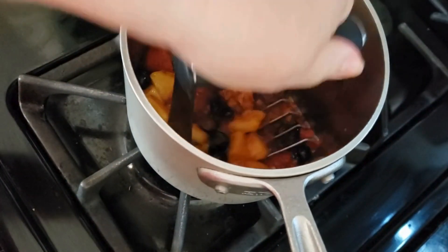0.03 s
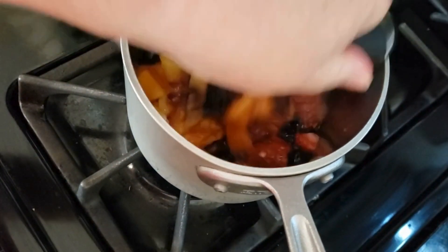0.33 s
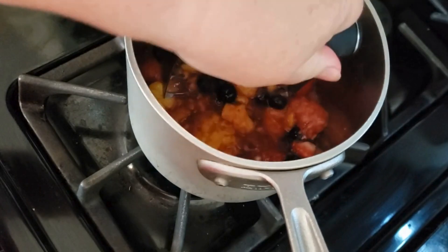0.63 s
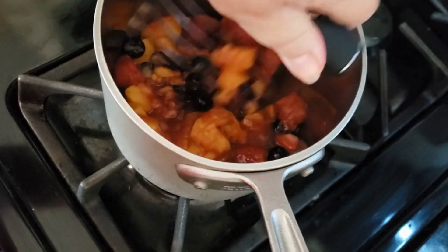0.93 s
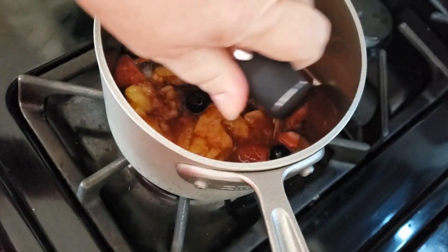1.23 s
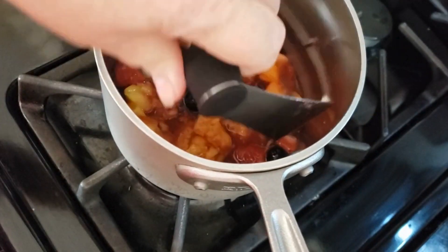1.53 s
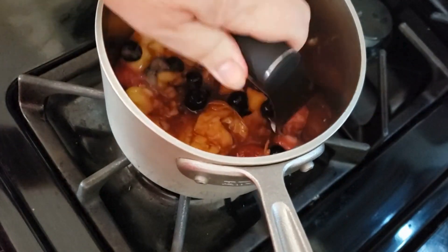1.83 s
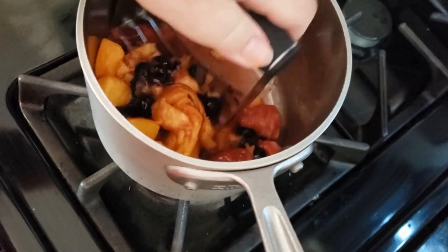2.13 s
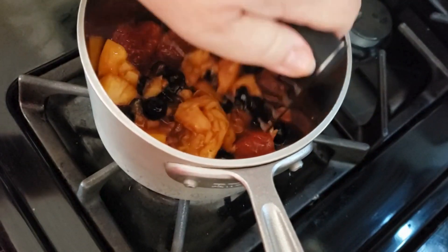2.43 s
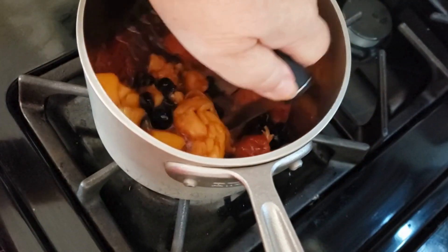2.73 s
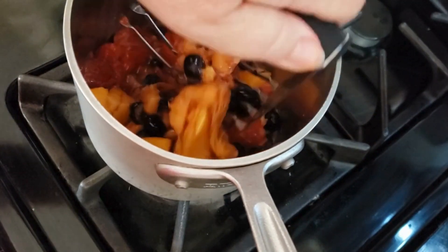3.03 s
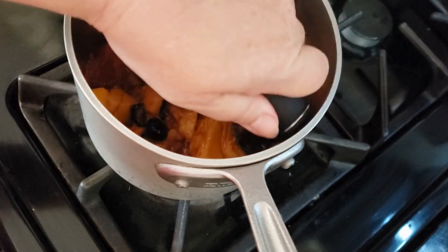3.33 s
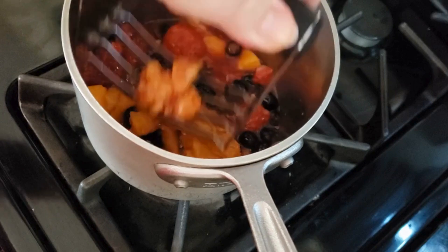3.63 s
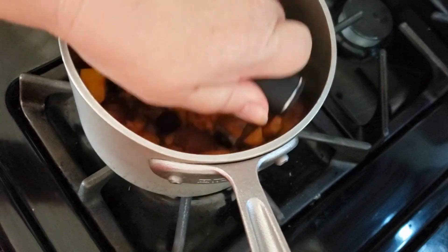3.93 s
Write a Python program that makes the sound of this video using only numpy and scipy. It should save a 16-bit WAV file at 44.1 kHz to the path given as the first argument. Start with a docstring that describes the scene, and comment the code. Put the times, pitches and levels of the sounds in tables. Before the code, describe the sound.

Wire masher knocking irregularly on a steel pan, with wet squelches of crushed fruit.

```python
"""Mashing fruit in a saucepan

A wire masher crushes soft fruit in a steel pan on a gas stove, close to a phone in a kitchen.
The wire clanks, taps and scrapes on the pan wall, and squeaks once. Each push thumps the pan
on its grate and squeezes the wet pulp: bubbles pop, juice spits and one air pocket plops."""
import sys
import numpy as np
from scipy import signal
from scipy.fft import rfft, irfft, next_fast_len
from scipy.io import wavfile
from scipy.ndimage import uniform_filter1d

SR = 44100
rng = np.random.default_rng(int(sys.argv[2]) if len(sys.argv) > 2 else 0)


def file_out(sig):
    """Save sig as 16-bit WAV at sys.argv[1]."""
    # one column per channel
    cols = np.atleast_2d(sig).T
    # limit, then scale
    lim = np.clip(cols, -1, 1)
    pcm = np.round(lim * 32767).astype(np.int16)
    wavfile.write(sys.argv[1], SR, pcm)


N = 176400  # 4 seconds
TIME = np.arange(N) / SR
ONE_SECOND = TIME[:SR]
HIT_DB, RING_DB = 27, -14.5  # boost for wire hits; level of the ringing they cause
PAN_LIKENESS = 0.52  # how alike the pan's noise is on the left and right

def gain(db):
    """Turn decibels into a number to multiply by."""
    return 10 ** (np.asarray(db) / 20)

def unit(x):
    """Scale each channel to an energy of 1."""
    return x / np.sqrt(np.sum(x ** 2, axis=-1, keepdims=True) + 1e-18)

def fade(fade_s, t=ONE_SECOND):
    """A curve that drops by 60 dB every fade_s seconds."""
    return np.exp(-np.log(1000) * t / fade_s)

def colour(x, points):
    """Shape the tone along (pitch_hz, level_db) points; white noise keeps its power."""
    size = next_fast_len(x.shape[-1] + 4096)
    size += size % 2
    hz, db = np.array(points, float).T
    curve_db = np.interp(np.log(np.fft.rfftfreq(size, 1 / SR) + 1), np.log(hz), db)
    # fold the filter in time so that it never sounds before a hit
    cepstrum = irfft(np.log(gain(curve_db)))
    cepstrum[1:size // 2] *= 2
    cepstrum[size // 2 + 1:] = 0
    response = np.exp(rfft(cepstrum))
    response /= np.sqrt(np.mean(abs(response) ** 2))
    return irfft(rfft(x, size) * response)[..., :x.shape[-1]]

def only(x, kind, hz):
    """Let only the "low" part, the "high" part or a "band" through."""
    return signal.sosfilt(signal.butter(2, hz, kind, fs=SR, output="sos"), x)

def noise(count, likeness):
    """Stereo hiss: likeness 0 makes the two sides unrelated, 1 makes them the same."""
    mid, side = rng.standard_normal((2, count))
    return (np.sqrt(1 + likeness) * mid + np.sqrt(1 - likeness) * np.array([side, -side])) / np.sqrt(2)

def add(out, start_s, x):
    """Mix a sound in at its start time."""
    i = int(start_s * SR)
    out[..., i:i + x.shape[-1]] += x[..., :max(N - i, 0)]

def through(x, response):
    """Make every sample of x set off a stereo ring or echo."""
    return signal.fftconvolve(np.atleast_2d(x), response, axes=-1)[:, :N]

def swell(start_s, length_s):
    """A rounded rise and fall."""
    return np.sin(np.pi * np.clip((TIME - start_s) / length_s, 0, 1)).clip(0) ** .5

def crackle(per_s, spread_db=8.5):
    """Random clicks of uneven size."""
    clicks = (rng.random(N) < per_s / SR) * rng.choice([-1, 1], N)
    clicks = clicks * gain(spread_db * rng.standard_normal(N).clip(-2, 2))
    return clicks / (clicks.std() + 1e-12)

# tone of the room's background: pitch_hz, level_db
AIR_TONE = [(20,-40),(58,7.5),(100,-3),(250,-9),(600,-21.5),(2000,-31.5),(16000,-35)]
def room_air():
    """The air of the room makes a faint, steady, low rush."""
    return gain(-59) * colour(noise(N, 0.66), AIR_TONE)

def ring(notes):
    """Steel rings in close pairs of notes; the spot hit sets their strength, the fruit their tuning."""
    t = ONE_SECOND[:SR // 3]
    out = np.zeros((2, len(t)))
    for hz, db in notes:
        strength, detune, apart, phase = rng.standard_normal(4)
        pair_hz = hz * (1 + 0.0036 * detune + 0.007 * apart * np.array([-.5, .5]))
        first = np.sin(2 * np.pi * pair_hz[0] * t)
        second = np.sin(2 * np.pi * pair_hz[1] * t + np.pi * phase) / 2
        out += gain(db + 7 * strength) * np.array([first + second, first - second])
    return unit(out * fade(0.16, t))

def wire_buzz(hz):
    """The struck wire buzzes around its own note until the fruit damps it."""
    buzz = only(noise(SR, PAN_LIKENESS), "band", hz * 2 ** (np.array([-1, 1]) / 20))
    return unit(buzz * fade(0.047))[:, :SR // 3]

# high notes of the pan's wall and low notes of its body: pitch_hz, level_db
WALL_NOTES = [(3257,-12),(3700,-2),(5617,-8),(7280,-7),(9900,-2)]
BODY_NOTES = [(452,2),(1530,-8.5),(2330,4)]
# wire hitting the wall: start_s, level_db, chatter_s, bass_db, treble_db, body_ring_db, wire_pitch_hz
WIRE_HITS = [(0.0759,-19.5,0.0033,-11.5,2.5,-11,7070),(0.1376,-30,0.00058,8.5,4.5,-1,5440),(0.415,-25.5,0.008,-6.5,-3.5,-12,4140),
             (0.7555,-21.5,0.00022,1,4.5,-6.5,5390),(0.827,-31.5,0.0068,0,2,9.5,5000),(1.142,-26,0.0028,2.5,1,-1,3560),
             (1.6084,-22,0.0053,-5,0,5.5,5840),(1.7685,-32,0.0025,3.5,-10.5,-10,3210),(1.871,-37.5,0.0023,2,-2,10,7450),
             (2.166,-40,0.0026,6.5,-3.5,-11,3530),(2.3192,-22.5,0.0061,-7,3,-1.5,3760),(2.3745,-22.5,0.0023,5.5,2,-2,3800),(2.6736,-24.5,0.0012,-4,-0.5,-9,4410),(2.719,-27.5,0.0032,5.5,16,-1.5,1500),
             (2.8262,-31,0.00081,-3.5,4.5,3.5,3900),(3.1516,-12.5,0.0095,-6,9,-0.5,7150),(3.161,-17,0.0056,-16,-1.5,2.5,3780),(3.2563,-27,0.0013,11.5,9.5,-3.5,1540),(3.5449,-26.5,0.0091,0.5,0.5,-6,4260)]
def clanks():
    """Each hit chatters and sets pan and wire ringing. Gives the push on the wall and the ringing."""
    force, rings, t = np.zeros(N), np.zeros((2, N)), ONE_SECOND[:SR // 20]
    for start_s, db, chatter_s, bass_db, treble_db, body_db, wire_hz in WIRE_HITS:
        contact = rng.standard_normal(len(t)) * np.exp(-t / chatter_s)
        contact[0] += 1.36  # the first impact, ahead of the chatter
        tone = [(900, bass_db), (3000, 0), (5500, 0), (11000, treble_db)]
        add(force, start_s, gain(db + HIT_DB) * unit(colour(contact, tone)))
        wall = gain(RING_DB) * ring(WALL_NOTES)
        body = gain(body_db - 15.5) * ring(BODY_NOTES)
        wire = gain(-10) * wire_buzz(wire_hz)
        add(rings, start_s, gain(db + HIT_DB) * (wall + body + wire))
    return force, rings

# tone of the struck wall: pitch_hz, level_db
CLASH_TONE = [(100,-18.5),(400,0.5),(1400,-6.5),(1900,-16),(2800,-5),(3700,6),(4800,-3.5),(5600,5),(6400,-4.5),(7300,1),(10000,-5),(12500,-5.5),(15500,-16)]
def wall_clash(force):
    """The wall answers each push with a sharp tick and a clash of many short notes."""
    clash = unit(noise(SR, PAN_LIKENESS) * fade(0.061))
    tick = gain(-6) * unit(noise(SR, PAN_LIKENESS) * fade(0.012))
    return through(force, unit(colour(clash + tick, CLASH_TONE)))

# notes of the full pan on its grate: pitch_hz, level_db, fade_s
GRATE_NOTES = [(62.8,-19.5,0.99),(127.6,-12,0.28),(150.8,1,0.21),(209.6,-22,0.41),(292.4,-11.5,0.22),(363.3,-17.5,0.33),(690.7,-9,0.063)]
# tones of the dull knock and of the stove top's rumble: pitch_hz, level_db
KNOCK_TONE = [(60,-4),(300,-5.5),(1250,0),(1700,-6.5),(2100,-7.5),(4000,-17),(16000,-33.5)]
RUMBLE_TONE = [(20,-63),(38,-29.5),(55,2.5),(80,-8),(125,1),(170,-5),(230,-13.5),(2000,-84)]
# pan bumping the grate: start_s, level_db, extra_knock_db, extra_rumble_db
PAN_THUMPS = [(0.082,-39.5,13,13),(0.139,-36.5,-6,-10),(0.2447,-29,1,0.5),(0.424,-36.5,10,-0.5),(0.669,-24,11.5,-4.5),(0.845,-38.5,11,10),(.955,-29,12,-30),
              (1.415,-49.5,-52,13.5),(1.612,-42.5,18,7.5),(1.771,-35.5,-16,0.5),(1.886,-23.5,5,-7),(2.088,-34.5,-10,5),(2.191,-32.5,-1,0),(2.327,-36.5,11.5,10),
              (2.68,-34.5,-4,-16),(2.721,-34.5,7.5,8),(2.829,-38.5,12,10.5),(3.167,-32.5,15,5),(3.260,-31.5,-0.5,9.5),(3.55,-44,14,4.5)]
def thumps():
    """Pushes cushioned by fruit: the pan knocks and bounces on its grate, and the stove top rumbles."""
    bounces, knock_power, rumble_power = np.zeros((3, N))
    t = ONE_SECOND[:SR * 3 // 4]
    for start_s, db, knock_db, rumble_db in PAN_THUMPS:
        tunings = 1 + 0.021 * rng.standard_normal(len(GRATE_NOTES))
        bounce = np.zeros(len(t))
        for (hz, note_db, fade_s), tuning in zip(GRATE_NOTES, tunings):
            strength = gain(note_db + rng.uniform(-3, 3))
            bounce += strength * np.sin(2 * np.pi * hz * tuning * t) * fade(fade_s, t)
        soft_start = 1 - fade(0.022, t)
        add(bounces, start_s, gain(db + 4.5) * bounce * soft_start)
        add(knock_power, start_s, (gain(db + knock_db - 11.5) * fade(0.15)) ** 2)
        add(rumble_power, start_s, (gain(db + rumble_db - 7.5) * fade(0.57)) ** 2)
    knocks = colour(np.sqrt(knock_power) * noise(N, 0.1), KNOCK_TONE)
    rumble = colour(np.sqrt(rumble_power) * noise(N, 0.13), RUMBLE_TONE)
    return bounces + knocks + rumble

# wire just touching the wall: start_s, level_db
WIRE_TAPS = [(.562,-48),(0.6542,-44.5),(.967,-38),(1.4087,-51),(1.506,-58.5),(1.7036,-43.5),(2.2455,-56.5),(3.088,-57.5)]
def taps():
    """Each light touch gives the wall a tiny, rough push."""
    force = np.zeros(N)
    for start_s, db in WIRE_TAPS:
        add(force, start_s, gain(db + HIT_DB) * unit(rng.standard_normal(SR) * fade(0.0092)))
    return force

# tone of the wet pulp: pitch_hz, level_db
PULP_TONE = [(80,-37),(250,18.5),(600,12.5),(2000,-3.5),(4000,-15.5),(16000,-9)]
# pulp squeezed through the wires: start_s, length_s, level_db, extra_rumble_db
PULP_SQUEEZES = [(0.563,0.29,-58,-3),(0.698,0.34,-46.5,5),(0.93,0.091,-45.5,4.5),(1.864,0.13,-47,0),(2.042,0.091,-41,4.5),(2.12,0.12,-45,11.5),(2.708,0.26,-46,6.5),(3.78,0.093,-52.5,0.5)]
def squishes():
    """Tiny bubbles burst in the pulp, each at its own pitch, while the pressure shakes the stove top."""
    pops_per_s, pop_cycles = 420, 9.1
    squeeze, shake = np.zeros((2, N))
    for start_s, length_s, db, rumble_db in PULP_SQUEEZES:
        squeeze += gain(db) * swell(start_s, length_s)
        shake += gain(db + rumble_db) * swell(start_s, length_s)
    rumble = colour(shake * noise(N, 0.17), RUMBLE_TONE)
    pops = np.zeros((2, N))
    for when, pitch, size, side in rng.random((int(pops_per_s * N / SR), 4)):
        hz = 250 * 20 ** pitch
        cycles = hz * ONE_SECOND[:int(SR * pop_cycles / hz)]
        phase = 2 * np.pi * cycles * (1 + 0.054 * cycles / pop_cycles)  # each pop rises a little
        ear_shift = np.array([[1], [-1]]) * (side - .5) * np.pi
        pop = np.sin(phase + ear_shift) * fade(pop_cycles, cycles)
        add(pops, when * N / SR, hz * gain(9 * size ** 2) * pop)
    pulp = colour(through(pops, noise(SR, 0.84) * fade(0.044)), PULP_TONE)
    return gain(1.5) * squeeze * pulp / pulp.std() + gain(0.5) * rumble

# juice spitting between wire and steel: start_s, length_s, level_db
JUICE_SPURTS = [(1.005,0.048,-40.5),(1.85,0.06,-38),(1.938,0.064,-42),(2.738,.09,-46.5)]
def juice():
    """Thin films of juice snap in a bright, uneven crackle."""
    flow = sum(gain(db) * swell(start_s, length_s) for start_s, length_s, db in JUICE_SPURTS)
    snaps = flow * crackle(per_s=2500)
    drops = through(snaps, unit(noise(SR, PAN_LIKENESS) * fade(0.044)))
    return only(drops, "band", [3800, 13000])

# wire sliding on steel: start_s, length_s, level_db
WIRE_SLIDES = [(1.129,0.049,-26.5),(1.203,0.11,-41),(1.293,0.037,-43),(1.676,0.078,-45),(2.477,0.079,-45),(3.685,0.12,-45)]
def scrapes():
    """The sliding wire sticks and slips, giving the wall many tiny pushes."""
    pressure = sum(gain(db - 3.5) * swell(start_s, length_s) for start_s, length_s, db in WIRE_SLIDES)
    return pressure * crackle(per_s=1700)

# where the wire meets the wall: time_s, left_minus_right_db
WIRE_PLACES = [(.75,-2),(1.15,0),(1.65,-2.5),(2.3,-1)]
def masher():
    """Clanks, taps and scrapes all sound through the same steel pan."""
    hit_force, hit_rings = clanks()
    tap_force, slide_force = taps(), scrapes()
    steel = wall_clash(hit_force + tap_force + slide_force) + hit_rings
    steel += gain(RING_DB) * through(slide_force, ring(BODY_NOTES + WALL_NOTES))
    balance_db = np.interp(TIME, *np.array(WIRE_PLACES).T)
    return steel * gain(np.array([balance_db, -balance_db]) / 2)

def squeak():
    """One slide locks into a short, rough squeak that stops with the wire."""
    waver = uniform_filter1d(rng.standard_normal(N), size=40)
    pitch_hz = 5680 * (1 + 0.025 * waver / waver.std())
    phase = 2 * np.pi * np.cumsum(pitch_hz) / SR + np.array([[0], [1]])
    return gain(-30) * swell(start_s=1.291, length_s=0.03) * np.sin(phase)

def plop(start_s=2.086, start_hz=560):
    """A pocket of air escapes from the pulp as two bubbles, rising in pitch."""
    out = np.zeros(N)
    phase = 2 * np.pi * start_hz * ONE_SECOND * (1 + 2 * ONE_SECOND)
    bubbles = np.sin(phase) + .5 * np.sin(1.22 * phase)
    add(out, start_s, gain(-29.5) * fade(0.038) * bubbles)
    return out

def microphones(x):
    """The two microphones sit close together, so low sounds reach both nearly alike."""
    mid = x.mean(axis=0)
    side, mismatch = x - mid, 0.24
    return mid + only(side, "high", 664) + mismatch * side

def kitchen(x):
    """Hard walls add an echo that dies sooner in the treble; its bass is alike in both ears."""
    low = only(noise(SR, 0) * fade(0.61), "low", 5000)
    high = only(noise(SR, 0) * fade(0.38), "high", 5000)
    echo = low + high
    mid = echo.mean(axis=0)
    echo = mid + only(echo - mid, "high", 450)
    soft_start = 1 - fade(0.04)
    return x + gain(-10) * through(x, unit(echo * soft_start))

def scene():
    """Masher, pan and fruit over the quiet air of the room."""
    air = room_air()
    mashing = masher() + juice() + thumps() + plop() + squishes()
    return kitchen(microphones(mashing)) + squeak() + air

def record(dry):
    """The phone cuts off the highest treble."""
    top_hz = 15900
    return signal.sosfilt(signal.ellip(8, .2, 80, top_hz, fs=SR, output="sos"), dry)

dry = scene()
out = record(dry)
file_out(out)
```